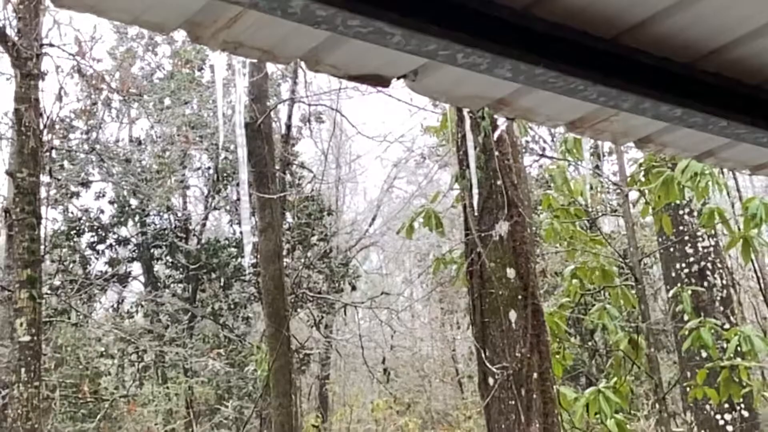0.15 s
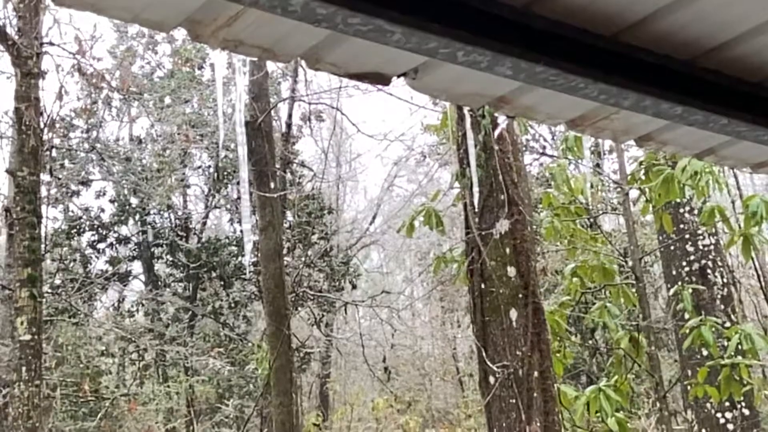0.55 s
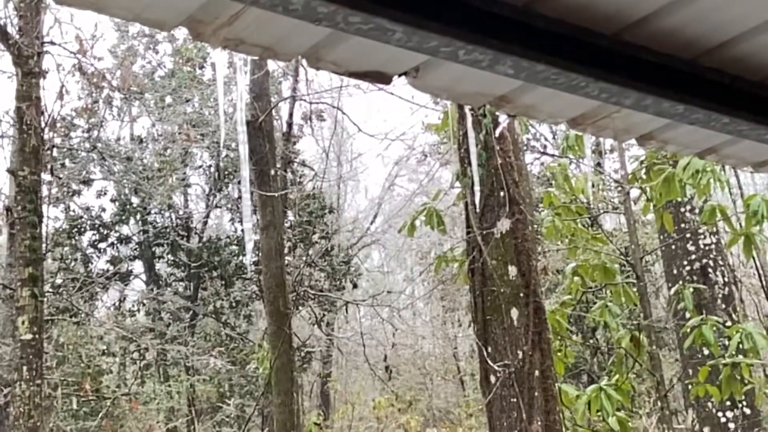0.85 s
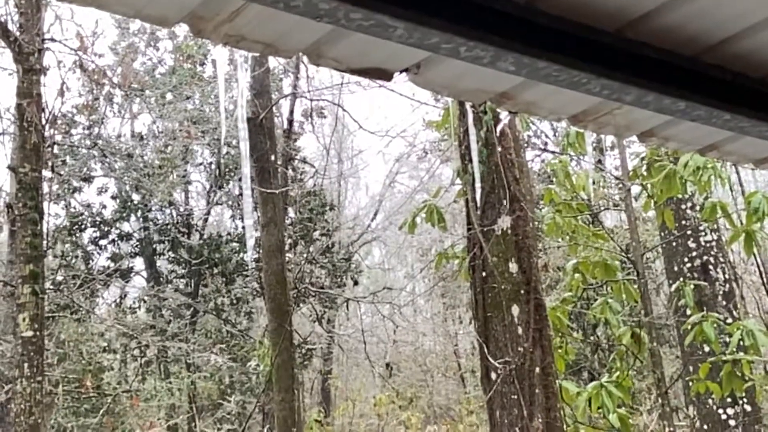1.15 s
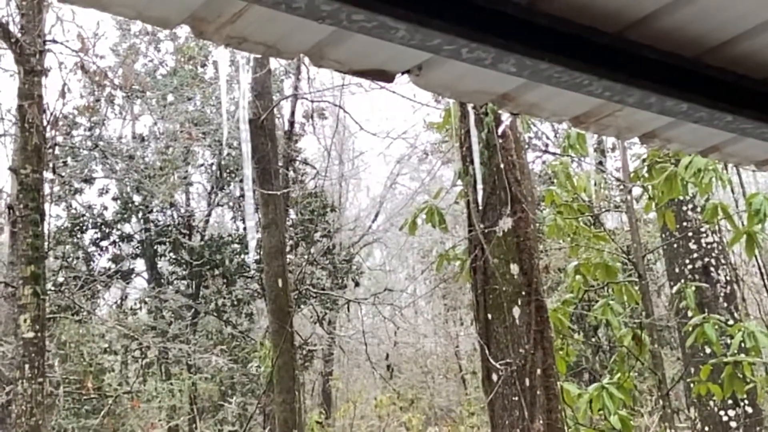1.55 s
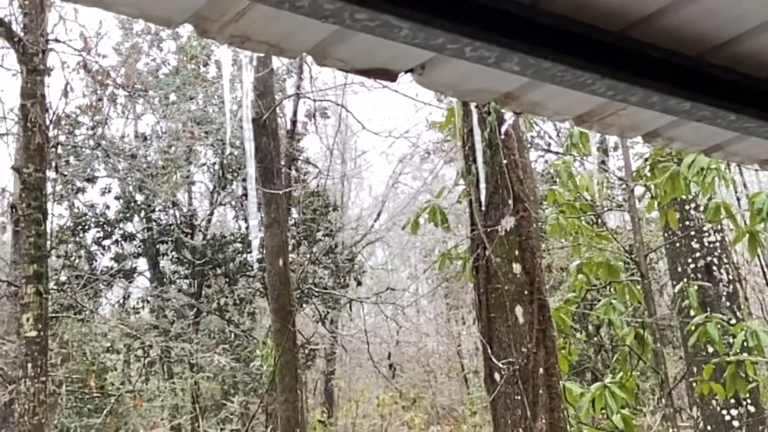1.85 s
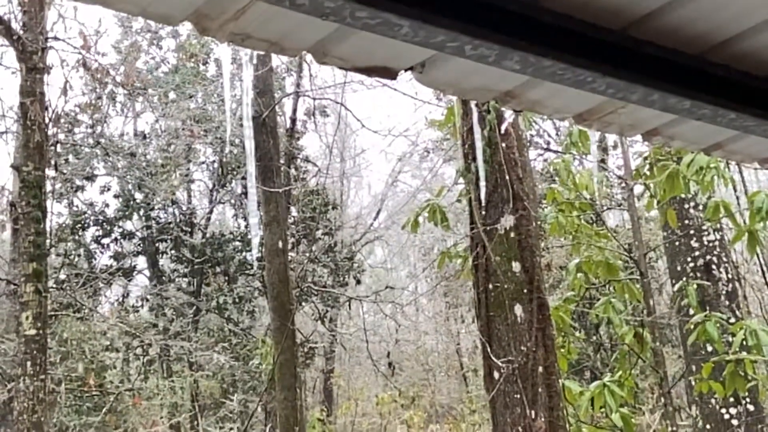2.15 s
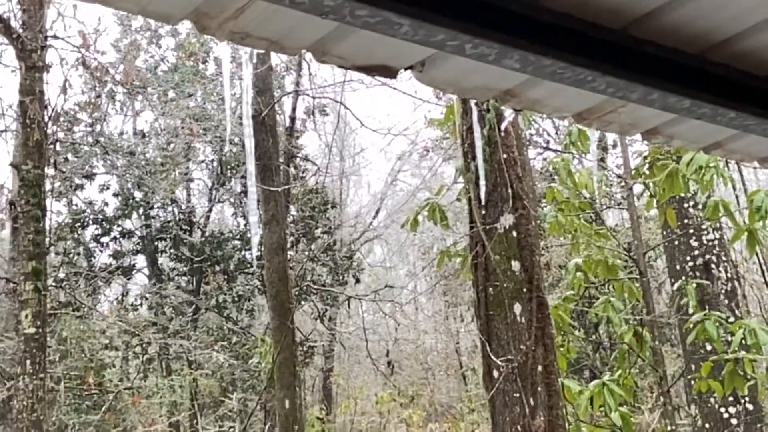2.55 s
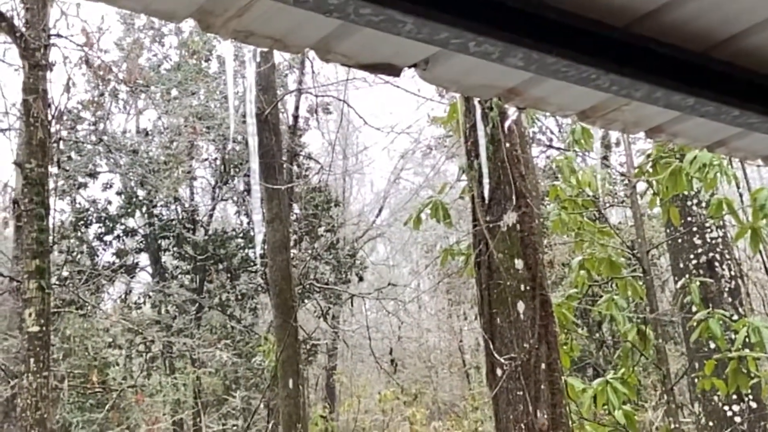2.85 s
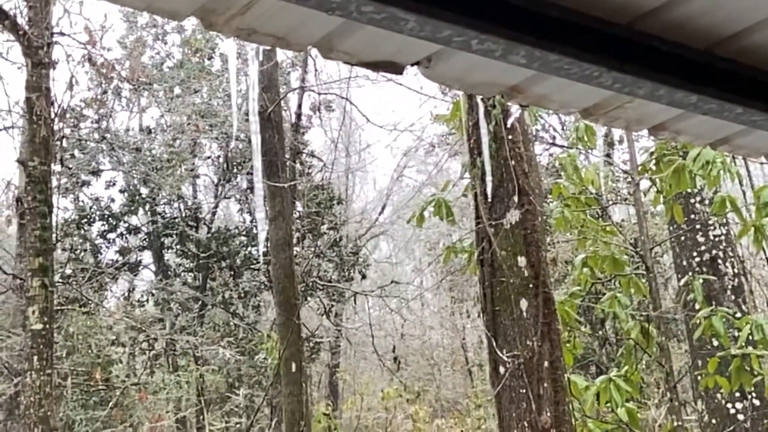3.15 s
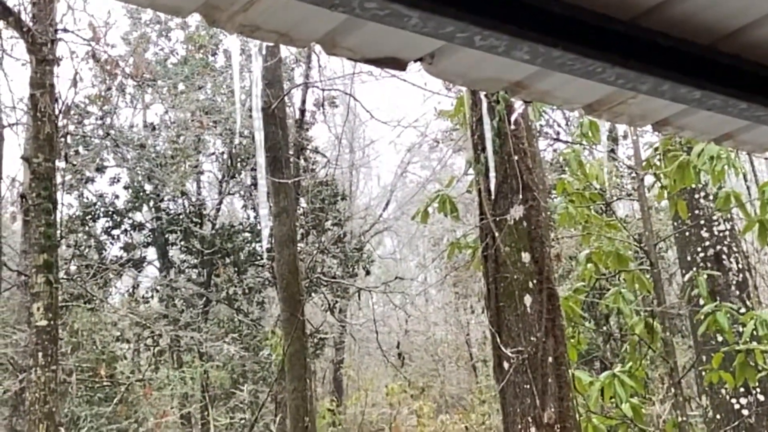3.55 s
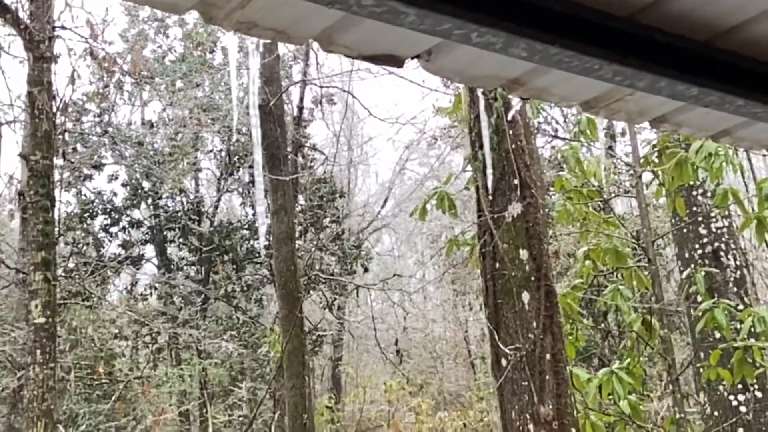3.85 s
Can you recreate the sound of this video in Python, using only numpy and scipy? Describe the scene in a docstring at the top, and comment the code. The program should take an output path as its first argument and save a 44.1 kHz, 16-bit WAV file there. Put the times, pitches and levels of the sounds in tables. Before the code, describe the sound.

Rain and meltwater drip steadily under a metal porch roof, fat drops splatting and ticking

```python
"""Rain under a metal porch roof

Rain and meltwater heard from under a sheet-metal porch roof at the edge of a wood.
Shaped noise and grains make a dense patter over a low rumble; small ringing drops fizz around it.
Fat drops splat on wet ground and leaves (struck resonators) and tick on the metal edge (bright bursts).
Some fall into puddles with a short rising plink (gliding tones). A faint tone and a wide wash lie behind."""
import sys
import numpy as np
from scipy import signal
from scipy.fft import rfft, irfft
from scipy.io import wavfile

SR = 44100
rng = np.random.default_rng(int(sys.argv[2]) if len(sys.argv) > 2 else 0)


def dump(signal):
    """Clip the signal to [-1, 1] and save it as 16-bit WAV at the path in sys.argv[1]."""
    limited = np.clip(np.atleast_2d(signal).T, -1, 1)
    pcm = np.round(limited * 32767).astype(np.int16)
    wavfile.write(sys.argv[1], SR, pcm)


N = 176400


def from_db(db):
    """dB to gain."""
    return 10 ** (np.asarray(db) / 20)


def rms_one(x):
    """Scale to rms 1."""
    return x / np.sqrt(np.mean(x ** 2) + 1e-20)


def in_time(rows):
    """A (time, value) curve at every sample."""
    return np.interp(np.arange(N) / SR, *np.transpose(rows))


def drift(rate_hz):
    """Slow random curve of rms about 1: noise through two equal poles at rate_hz, one step per 40 samples."""
    pole = np.exp(-80 * np.pi * rate_hz / SR)
    noise = rng.standard_normal(N // 40 + 2002)
    slow = signal.lfilter([1], [1, -2 * pole, pole * pole], noise)[2000:]  # settled part
    return np.interp(np.arange(N) / 40, np.arange(len(slow)), rms_one(slow))


def coloured(x, spectrum):
    """Filter x by a spectrum that heads to -90 dB beyond its ends; rms 1."""
    hz, db = np.transpose([(5, -90), *spectrum, (spectrum[-1][0] * 1.25, -90)])
    grid_hz = np.maximum(np.fft.rfftfreq(N, 1 / SR), 1)
    gain = from_db(np.interp(np.log(grid_hz), np.log(hz), db))
    return rms_one(irfft(rfft(x) * gain, N))


def clicks(rate_per_s, spread_db, size):
    """Random clicks of either sign, their heights scattered exponentially in dB."""
    signs = rng.choice([-1, 1], size)
    heights = from_db(spread_db * np.minimum(rng.exponential(1, size), 5)) * signs
    return heights * (rng.random(size) < rate_per_s / SR)


def fade(t, t60_s):
    """Falls 60 dB in t60_s (2 ms at least)."""
    return from_db(-60 * t / np.maximum(t60_s, .002))


# patter spectrum: (frequency [Hz], relative density [dB per Hz])
PATTER_SPECTRUM = [(150, 2.5), (250, -3), (400, -2), (600, -2), (830, 1), (1200, -3), (1550, -11.5),
                   (2500, -4), (4000, -8), (6500, -4.5), (9500, -10.5), (13000, -0.5), (16000, -20.5)]
PATTER_RMS_DB, PATCHY_DB, BAND_PATCHY_DB = -43, 1.17, 1.83
GRAINS_PER_S, GRAIN_SPREAD_DB, GRAIN_POWER_SHARE = 2500, 2, 0.73


def patter():
    """Countless far drops: noise and fine grains, flickering partly together, partly band by band."""
    share = np.clip(GRAIN_POWER_SHARE, 0, 1)
    grains = rms_one(clicks(GRAINS_PER_S, GRAIN_SPREAD_DB, N))
    source = np.sqrt(1 - share) * rng.standard_normal(N) + np.sqrt(share) * grains
    low = signal.butter(2, 1500, fs=SR, output="sos")
    mix = signal.sosfilt(low, rng.standard_normal(N))  # no flicker here
    together, edges_hz = drift(24), np.geomspace(1500, 19000, 6)
    for band_hz in zip(edges_hz, edges_hz[1:]):
        part = signal.sosfilt(signal.butter(2, band_hz, "band", fs=SR, output="sos"), source)
        mix = mix + part * from_db(PATCHY_DB * together + BAND_PATCHY_DB * drift(26))
    return from_db(PATTER_RMS_DB) * coloured(mix, PATTER_SPECTRUM)


FIZZ_PER_S, FIZZ_SPREAD_DB, FIZZ_RMS_DB = 900, -0.5, -56
FIZZ_T60_CYCLES, FIZZ_TILT_DB_PER_OCTAVE = 81, 5.5


def fizz():
    """Small drops, each briefly ringing a decaying resonator at one of 30 pitches."""
    drops, pitches_hz = clicks(FIZZ_PER_S, FIZZ_SPREAD_DB, N), np.geomspace(1400, 15000, 30)
    dealt = rng.integers(0, 30, N)
    out = 0
    for k, hz in enumerate(pitches_hz):
        r, w = from_db(-60 * hz / FIZZ_T60_CYCLES / SR), 2 * np.pi * hz / SR
        struck = drops * (dealt == k) + 1e-18
        ring = signal.lfilter([0, np.sin(w)], [1, -2 * r * np.cos(w), r * r], struck)
        out = out + from_db(FIZZ_TILT_DB_PER_OCTAVE * np.log2(hz / pitches_hz[0])) * ring
    return from_db(FIZZ_RMS_DB) * rms_one(out)


# low outdoor rumble spectrum: (frequency [Hz], relative density [dB per Hz])
RUMBLE_SPECTRUM = [(13, -50), (22, -35), (43, 4), (65, 5.5), (121, 0.5), (221, -19.5), (300, -26.5),
                   (390, -31), (660, -120)]
# rumble level: (time [s], level [dB])
RUMBLE_LEVEL = [(0.0, -44.5), (3.72, -45.5), (3.79, -49.5), (3.92, -37.5), (4.0, -48)]


def rumble():
    """Low-frequency noise under a level curve."""
    return from_db(in_time(RUMBLE_LEVEL)) * coloured(rng.standard_normal(N), RUMBLE_SPECTRUM)


# side wash spectrum: (frequency [Hz], relative density [dB per Hz])
WASH_SPECTRUM = [(24, -38), (40, -5), (73, 7), (274, -4.5), (763, 4.5), (1030, 1.5), (1950, 1),
                 (2470, -11.5), (2990, -9.5), (3630, -42), (6600, -71)]
WASH_RMS_DB = -50.5


def wide_wash():
    """Shaped noise in opposite phase left and right, heard to the sides."""
    wash = from_db(WASH_RMS_DB) * coloured(rng.standard_normal(N), WASH_SPECTRUM)
    return wash * np.array([[1], [-1]])


HUM_HZ, HUM_WIDTH_HZ, HUM_DB, HUM_PAN_DB = 773.7, 3.5, -61, 2.5  # pan: left up, right down


def hum():
    """A faint wavering tone from far off: noise through a very narrow resonance."""
    b, a = signal.iirpeak(HUM_HZ, HUM_HZ / HUM_WIDTH_HZ, SR)
    tone = signal.lfilter(b, a, rng.standard_normal(2 * N))[N:]  # settled half
    return from_db(HUM_DB + HUM_PAN_DB * np.array([[1], [-1]])) * rms_one(tone)


# loudest splats: (time [s], body peak level [dB], ring pitch [Hz], spray gain [dB])
LOUD_SPLATS = [(0.0684, -36.5, 2470, 0), (0.1085, -31.5, 6500, -14), (0.158, -23.5, 7600, -12),
               (0.2428, -31, 2520, 4.5), (0.3643, -18.5, 4120, -10), (0.6845, -31, 6540, -16),
               (0.7833, -22, 6200, -10), (0.815, -28.5, 4900, -7.5), (0.8942, -35.5, 2450, -6),
               (1.058, -27, 7400, -12.5), (1.0962, -32, 5750, -3), (1.1427, -28, 4100, -16),
               (1.1469, -36, 4160, -16), (1.1752, -19, 3520, -9), (1.2343, -26.5, 5200, -9),
               (1.2503, -33, 2220, -5), (1.2835, -31, 2300, 2), (1.3294, -35, 4350, -6),
               (1.3487, -33, 3150, -2), (1.5233, -27, 4130, -9), (1.708, -34, 3850, -7),
               (1.8048, -35, 6800, -1.5), (2.003, -33.5, 2450, 0), (2.1385, -31.5, 5630, -4),
               (2.1832, -28.5, 3740, -11), (2.355, -31.5, 4250, 0), (2.381, -30.5, 2330, -3),
               (2.4808, -30, 7300, -4), (2.6003, -25.5, 6530, -9), (2.802, -32.5, 5300, -2),
               (2.9766, -31.5, 4560, -5), (3.055, -30.5, 3400, -2), (3.0902, -34, 2360, 14),
               (3.2675, -32, 3800, -9), (3.3135, -35, 4100, -2), (3.3536, -33.5, 3220, -10),
               (3.4002, -32.5, 5600, 7), (3.4122, -28, 4050, -4.5), (3.4642, -25, 4900, -11),
               (3.5335, -32.5, 4870, -9), (3.5868, -30, 2000, 5.5), (3.7554, -27.5, 3240, -4),
               (3.7798, -32.5, 4050, -7), (3.828, -32.5, 6800, -4), (3.862, -22, 3130, -6.5),
               (3.8624, -21.5, 5060, -12), (3.9435, -37.5, 3430, -3), (3.9955, -38, 4760, -15)]
# hit coming back off floor and wall: (delay [s], level [dB])
BOUNCES = [(.0042, -6.5), (.0095, -11.5)]
SMALL_SPLATS, SMALL_DB, SMALL_SPREAD_DB, SMALL_SPRAY_DB = 400, -45, 2, -3.5
HIT_NOISE_GAIN, HIT_T60_S, HIT_Q = 0.08, 0.0084, 3.6
RING_Q, RING_SPREAD = 5.1, 0.26  # spread in log frequency
TAIL_T60_S, SPRAY_PER_S, SPRAY_SPREAD_DB = 0.18, 1100, -3.5
CRACK_HIGHPASS_HZ, CRACK_EXTRA_T60_S, CRACK_DB = 8440, 0.1, -7.5


def splats():
    """Each drop: a hard hit, its bounces and a dying spray through three uneven rings, and a bright crack."""
    draw = rng.random((SMALL_SPLATS, 3))
    small_db = SMALL_DB - SMALL_SPREAD_DB * np.log(draw[:, 1] + 0.077)
    small = np.c_[draw[:, 0] * N / SR, small_db, 1500 * 5.0 ** draw[:, 2],
                  np.full(SMALL_SPLATS, SMALL_SPRAY_DB)]
    out, t = np.zeros(N + SR), np.arange(4096) / SR
    bright = signal.butter(2, CRACK_HIGHPASS_HZ, "high", fs=SR, output="sos")
    for start_s, db, hz, spray_db in [*LOUD_SPLATS, *small]:
        noise, chance = rng.standard_normal(len(t)), rng.standard_normal(4)
        spray = rms_one(clicks(SPRAY_PER_S, SPRAY_SPREAD_DB, len(t))) * .5 + noise
        hit = (t == 0) + HIT_NOISE_GAIN * noise * fade(t, HIT_T60_S)
        push = hit
        for late_s, loss_db in BOUNCES:
            late = int(late_s * SR * (1 + 0.06 * chance[3]))
            push = push + from_db(loss_db) * np.roll(hit, late)
        tail = from_db(spray_db) * spray * fade(t, TAIL_T60_S) * np.minimum(t / 0.002, 1)

        offsets = np.array([0, -1, 1]) + 0.31 * chance[:3] * [0, 1, 1]
        body = 0
        for ring_hz, gain in zip(hz * np.exp(RING_SPREAD * offsets), [1, .45, .35]):
            ring = signal.iirpeak(min(ring_hz, 15000), RING_Q, SR)
            body = body + signal.lfilter(*ring, tail + 0.53 * push) * gain
        broad = signal.iirpeak(hz, HIT_Q, SR)
        knock = signal.lfilter(*broad, signal.lfilter(*broad, push))
        body = body + knock / np.abs(knock).max()

        crack = signal.sosfilt(bright, push + tail * fade(t, CRACK_EXTRA_T60_S))
        drop = from_db(db) * body / np.abs(body).max()
        drop = drop + from_db(db + CRACK_DB) * crack / np.abs(crack).max()
        i = int(start_s * SR)
        out[i:i + len(t)] += drop
    return out[:N]


# drops on the metal edge: (time [s], peak level [dB])
EDGE_TICKS = [(0.108, -31), (0.3655, -22.5), (0.5646, -34), (1.055, -24.5), (1.632, -23), (1.7998, -25),
              (2.3447, -26), (2.4804, -29), (2.549, -23.5), (3.1345, -27.5), (3.1755, -20), (3.4637, -22),
              (3.861, -21)]
TICK_HIGHPASS_HZ, TICK_T60_S, TICK_BOUNCE_DB = 6600, 0.011, -13


def ticks():
    """A very short high-passed noise burst and its first bounce."""
    out, t = np.zeros(N + SR), np.arange(1024) / SR
    bright = signal.butter(2, TICK_HIGHPASS_HZ, "high", fs=SR, output="sos")
    for start_s, db in EDGE_TICKS:
        burst = signal.sosfilt(bright, rng.standard_normal(len(t)) * fade(t, TICK_T60_S))
        burst = burst + from_db(TICK_BOUNCE_DB) * np.roll(burst, int(BOUNCES[0][0] * SR))
        i = int(start_s * SR)
        out[i:i + len(t)] += from_db(db) * burst / np.abs(burst).max()
    return out[:N]


# drops into puddles: (time [s], peak level [dB], starting pitch [Hz], t60 [s])
PUDDLE_PLINKS = [(0.3797, -35.5, 1684, 0.053), (0.788, -38, 2076, 0.045), (0.985, -41, 1540, 0.054),
                 (1.0885, -34, 1113, 0.12), (1.0992, -33.5, 1218, 0.037), (1.2102, -38, 1056, 0.12),
                 (1.2835, -36, 1980, 0.054), (1.9465, -36, 2060, 0.066), (2.076, -34, 1600, 0.06),
                 (2.078, -36, 1250, 0.071), (2.1415, -34, 1710, 0.06), (2.1965, -41, 1460, 0.06),
                 (2.2195, -36, 1820, 0.069), (2.4508, -36.5, 1200, 0.085), (2.5117, -34, 1300, 0.065),
                 (2.7385, -35, 1190, 0.094), (2.853, -31.5, 1104, 0.079), (2.8968, -35, 1970, 0.079),
                 (3.0527, -34, 1103, 0.11), (3.492, -37, 1036, 0.06), (3.5857, -41, 2065, 0.29),
                 (3.8103, -41, 1300, 0.15), (3.8865, -40, 1026, 0.15), (3.8995, -29.5, 1080, 0.11),
                 (3.9125, -39, 1270, 0.26), (3.9493, -26.5, 1263, 0.034)]
SMALL_PLINKS, SMALL_PLINK_DB = 220, -48
PLINK_RISE_PER_S, PLINK_ATTACK_S, PLINK_EARLY_S = 4.6, 0.0019, 0.001195  # early: start before table time
WOBBLE_DEPTH, WOBBLE_HZ, WOBBLE_UNLIKE = 0.91, 133, 0.96  # unlike: each side's own part


def plinks():
    """Trapped bubbles ring with rising pitch, wobbling in strength, not quite alike on both sides."""
    draw = rng.random((SMALL_PLINKS, 3))
    small_db = SMALL_PLINK_DB - 3.0 * np.log(draw[:, 1] + .08)
    small = np.c_[draw[:, 0] * N / SR + PLINK_EARLY_S, small_db, 700 * 3.5 ** draw[:, 2],
                  np.full(SMALL_PLINKS, .05)]
    out, t = np.zeros((2, N + SR)), np.arange(4096) / SR
    slow = signal.butter(2, WOBBLE_HZ, fs=SR, output="sos")
    glide_s = t + PLINK_RISE_PER_S * t * t / 2
    for time_s, db, hz, t60_s in [*PUDDLE_PLINKS, *small]:
        real, imag = rms_one(signal.sosfilt(slow, rng.standard_normal((2, 3, len(t)))))
        shared, *own = real + 1j * imag
        wobble = 1 + WOBBLE_DEPTH * (shared + WOBBLE_UNLIKE * np.array(own))
        tone = np.imag(wobble * np.exp(2j * np.pi * hz * glide_s))
        tone = tone * (1 - np.exp(-(t / PLINK_ATTACK_S) ** 2)) * fade(t, t60_s)
        i = int((time_s - PLINK_EARLY_S) * SR)
        out[:, i:i + len(t)] += from_db(db) * tone / np.abs(tone).max()
    return out[:, :N]


def scene():
    """Patter, fizz, rumble, splats and ticks in the centre; wash, hum and plinks differ left and right."""
    centre = patter() + fizz() + rumble() + splats() + ticks()
    return centre + wide_wash() + hum() + plinks()


TREBLE_LAG_S, LAG_FROM_HZ, CUTOFF_HZ = .0002326, 6800, 15900


def record(dry):
    """In the high treble the left channel lags the right; the top is cut."""
    hz = np.fft.rfftfreq(N, 1 / SR)
    turn_rad = np.pi * TREBLE_LAG_S * np.maximum(hz - LAG_FROM_HZ, 0) * np.array([[-1], [1]])
    pair = irfft(rfft(dry) * np.exp(1j * turn_rad), N)
    top_cut = signal.cheby2(14, 50, CUTOFF_HZ + 150, fs=SR, output="sos")  # stopband edge, 50 dB down
    return signal.sosfilt(top_cut, pair)


dry = scene()
out = record(dry)
dump(out)
```